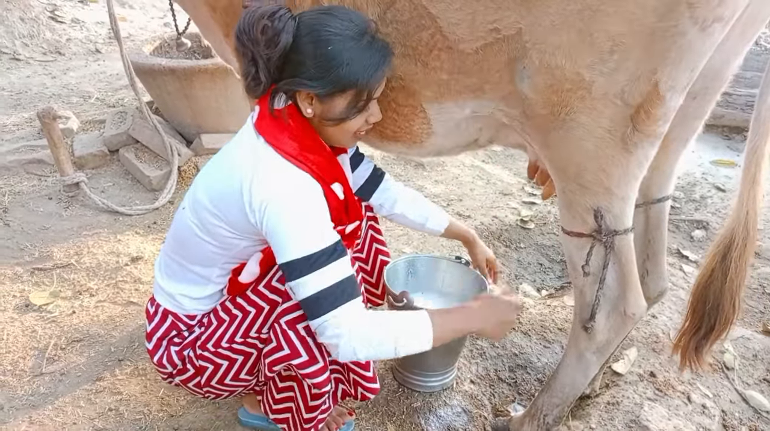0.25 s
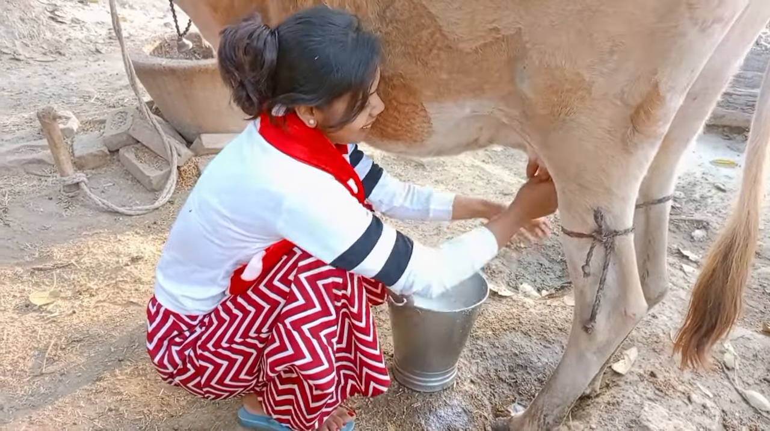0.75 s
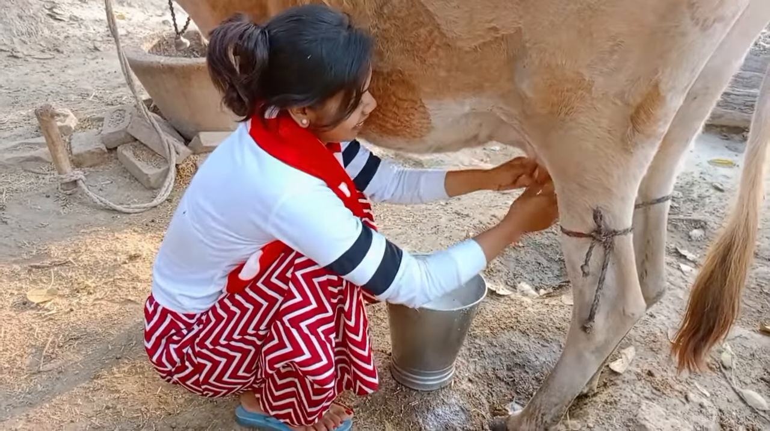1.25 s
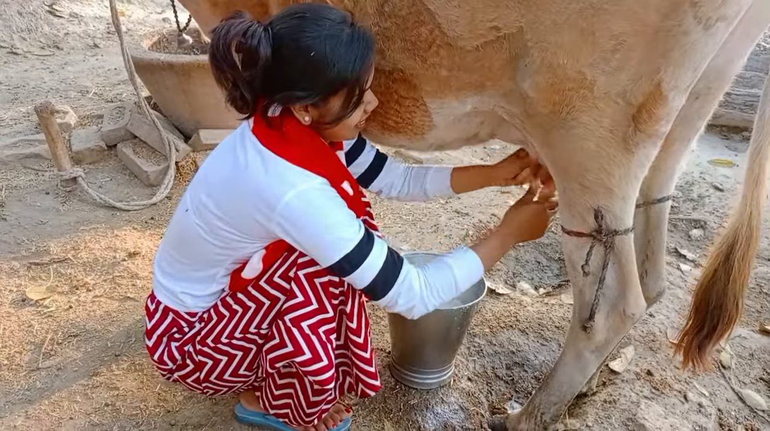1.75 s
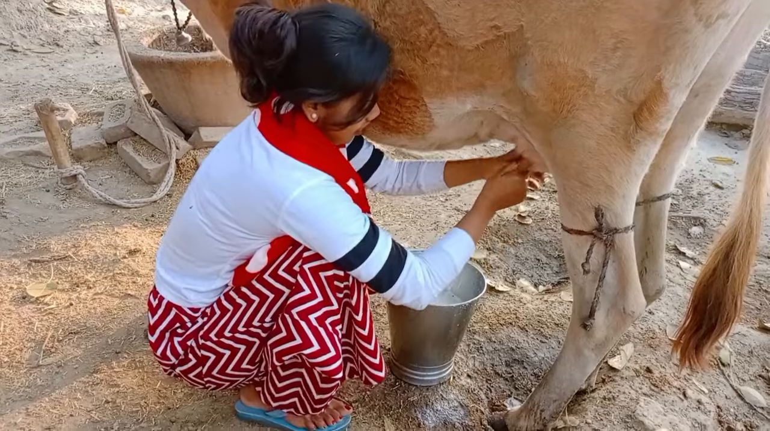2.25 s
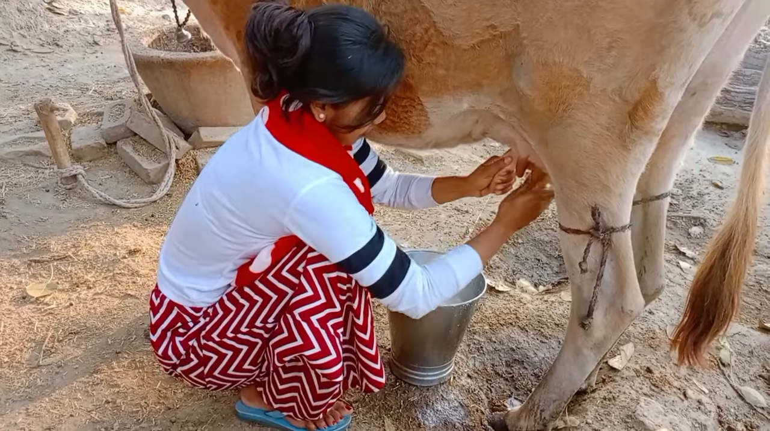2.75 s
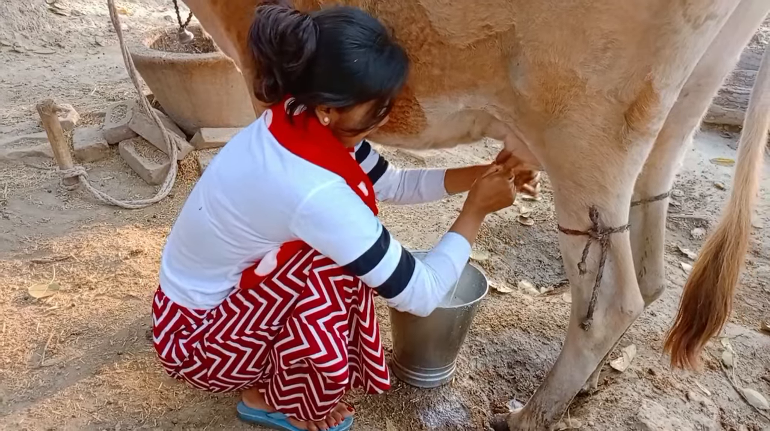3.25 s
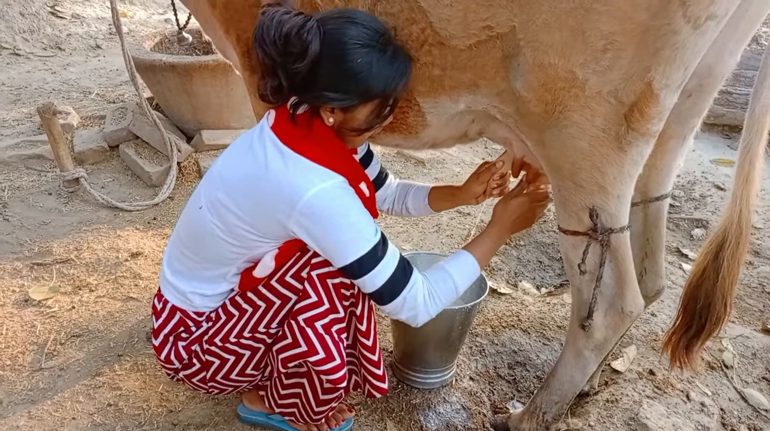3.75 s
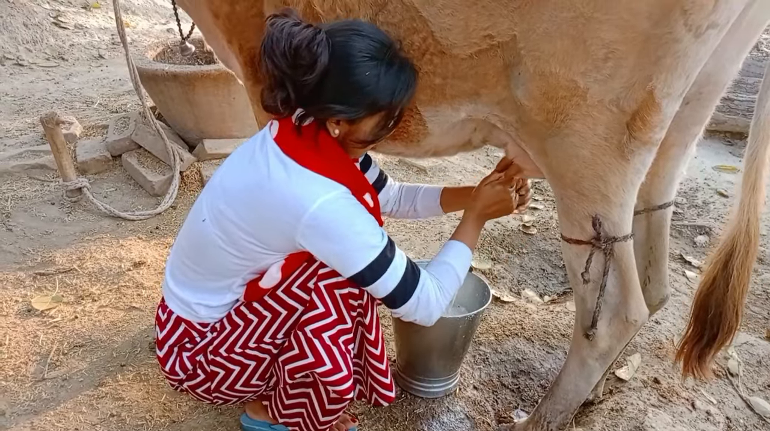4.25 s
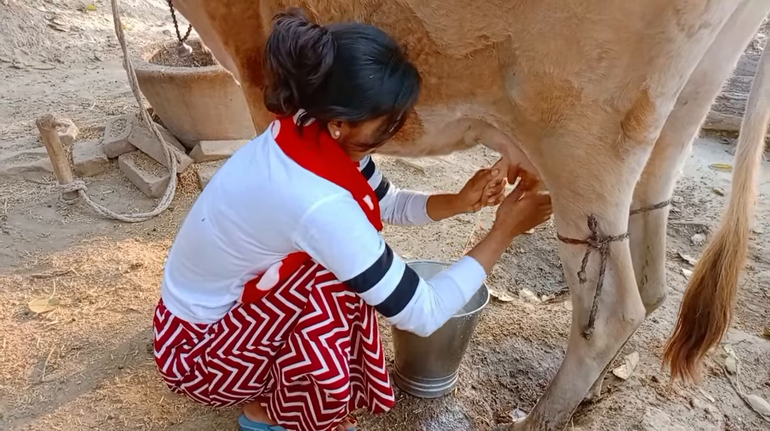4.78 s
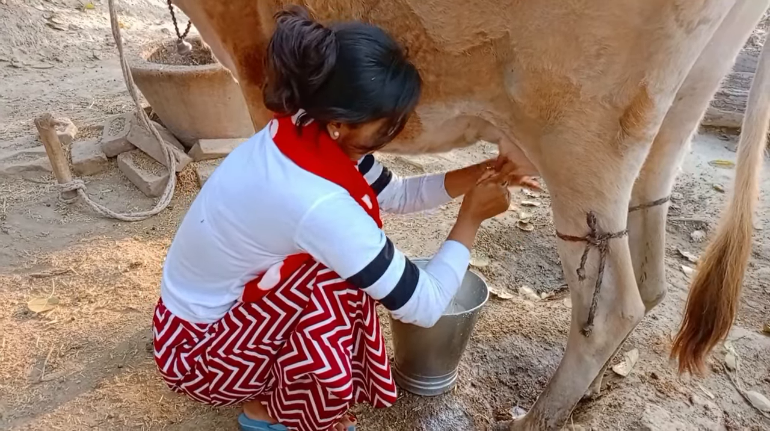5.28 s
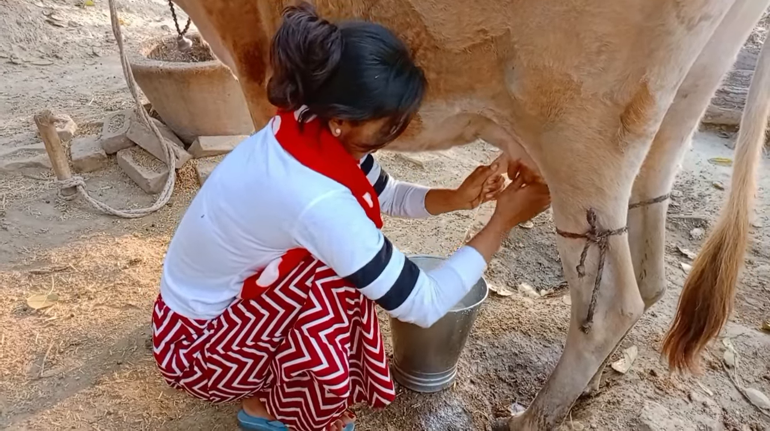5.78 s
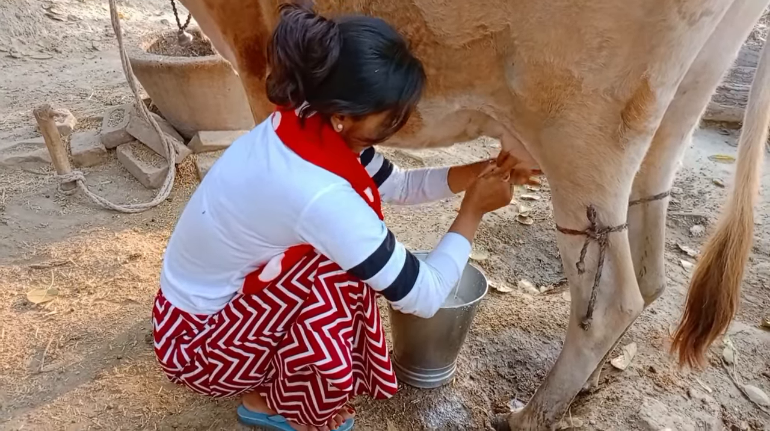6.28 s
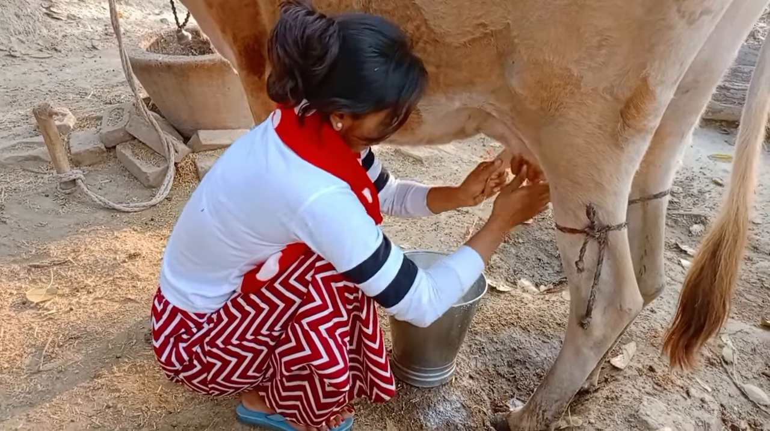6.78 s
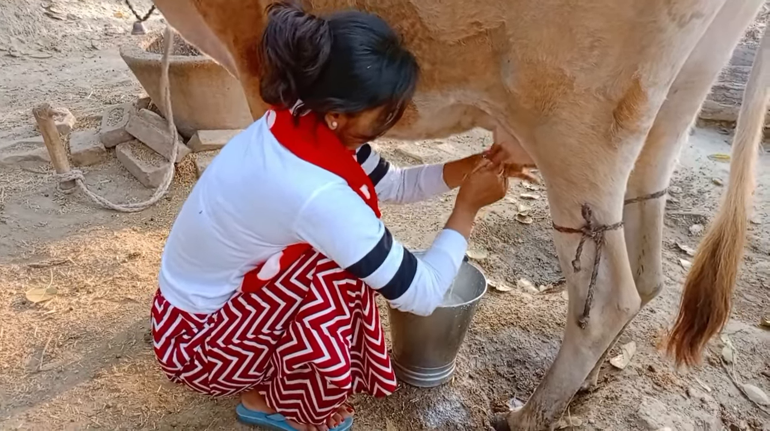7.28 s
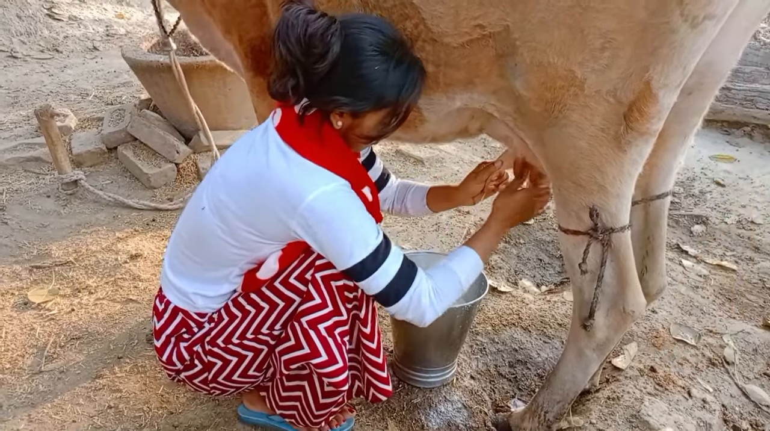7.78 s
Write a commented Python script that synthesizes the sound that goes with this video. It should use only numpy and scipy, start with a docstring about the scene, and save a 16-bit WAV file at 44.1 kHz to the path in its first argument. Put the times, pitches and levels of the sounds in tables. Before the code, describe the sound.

In an open farmyard, many small birds chatter continuously, mostly with short rising chirps at middle-high pitch, some raspy, plus thin peeps, over a blurred distant flock and light yard echoes. At 0 s a soft splash sounds in a metal bucket while a far single-cylinder engine thuds and drones, sinking away by about 2 s. Hoarse, longer calls of a larger bird overlap from 0.2 to 1.2 s. Gentle milk squirts come near 0.9 and 1.8 s, with a dull metallic knock at 1.7 s. Another faint jet arrives at 2.5 s, then the strongest hissing, splashing strokes at 3.1, 3.9 and 4.7 s, each about 0.3 s long and deepening in pitch. Drips tick around 4 s. Birds grow denser and louder from 5.2 to 7 s over lighter squirts at 5.5 and 6.2 s. Chirping thins as soft jets at 7.2 and 7.9 s close the scene.

```python
"""Hand milking among chattering birds

A cow is milked by hand in a farmyard; jets of milk, as random drops, hiss and splash in a metal bucket.
The bucket is knocked, dripped on and bumped: damped modes, two-tone ticks and wavering sines.
A flock chatters around it: arched, raspy glides, smeared by decaying noise echoes from walls and trees.
Far off a slow single-cylinder engine thuds and fades, with a drone at four times its firing rate."""
import sys
import numpy as np
from scipy import signal
from scipy.fft import rfft, irfft, next_fast_len
from scipy.io import wavfile
from scipy.ndimage import map_coordinates

SR = 44100
rng = np.random.default_rng(int(sys.argv[2]) if len(sys.argv) > 2 else 0)


def output_pcm(signal):
    """Save a mono or channel-first signal as 16-bit PCM at the path in sys.argv[1].

    Samples are clipped to [-1, 1] before scaling.
    """
    pcm = np.clip(np.atleast_2d(signal).T, -1, 1) * 32767
    wavfile.write(sys.argv[1], SR, np.round(pcm).astype(np.int16))


N = 354123
TIME = np.arange(N) / SR


def from_db(db):
    """Decibels to gain."""
    return 10 ** (np.asarray(db) / 20)


def rms_one(x):
    """Scale to unit rms."""
    return x / np.sqrt(np.mean(x ** 2) + 1e-20)


def in_time(rows):
    """Interpolate (time_s, value) rows at every sample."""
    return np.interp(TIME, *np.transpose(rows))


def coloured(x, spectrum):
    """Filter x by (freq_hz, gain_db) points, with a bass roll-off below the first; unit rms."""
    points_hz, points_db = np.transpose(spectrum)
    size = next_fast_len(N)
    bins_hz = np.maximum(np.fft.rfftfreq(size, 1 / SR), 1)
    gain = from_db(np.interp(np.log(bins_hz), np.log(points_hz), points_db))
    bass_cut = 1 + (points_hz[0] / 2 / bins_hz) ** 2
    return rms_one(irfft(rfft(x, size) * gain / bass_cut, size)[:N])


def wander(rate_hz, size):
    """Smooth random curve through normal draws made rate_hz times a second."""
    steps = np.arange(size) * rate_hz / SR
    return map_coordinates(rng.standard_normal(int(steps[-1]) + 2), [steps], order=2, mode="nearest")


def add(out, start_s, sound):
    """Mix a sound into out at start_s."""
    at = max(int(start_s * SR), 0)
    part = sound[:max(N - at, 0)]
    out[at:at + len(part)] += part


def swell(length_s, power):
    """Half-sine rise and fall raised to a power, unit rms; a low power is flatter."""
    size = max(int(length_s * SR), 20)
    return rms_one(np.abs(np.sin(np.linspace(0, np.pi, size))) ** power)


def yard(x, t60_s=0.44, gap_s=.008):
    """Dense echoes from walls, ground and leaves: decaying noise of unit energy after a gap."""
    t = TIME[:SR]
    echoes = rng.standard_normal(SR) * from_db(-60 * t / t60_s) * (t > gap_s)
    return signal.fftconvolve(x, echoes / np.linalg.norm(echoes))[:N]


# open air: freq_hz, gain_db
AIR_COLOUR = [(30, -18), (100, 1.5), (220, 1.5), (310, 1.5), (520, -6.5), (900, 2), (3000, -24.5),
              (6000, -34.5), (12000, -37), (16000, -29.5)]


def open_air(level_db=-66.5):
    """Steady coloured noise of the open air."""
    return from_db(level_db) * coloured(rng.standard_normal(N), AIR_COLOUR)


# hollow background: freq_hz, gain_db
HOLLOW_COLOUR = [(180, -18.5), (290, 1.5), (390, -1.5), (520, -25.5), (1000, -56.5)]


def rustle(level_db=-73, swell_db=5.5, rate_hz=7):
    """Faint hollow noise that swells and sinks unevenly."""
    gain = from_db(level_db + swell_db * wander(rate_hz, N))
    return gain * coloured(rng.standard_normal(N), HOLLOW_COLOUR)


# firing rate: time_s, firings_per_s
ENGINE_RATE = [(0, 20.7), (1.5, 20.7), (8.03, 23.1)]
# level of the thuds: time_s, level_db
THUD_LEVEL = [(0, -60), (.06, -43.5), (.16, -39), (.5, -58), (.65, -44.5), (.72, -60.5), (.89, -49),
              (.96, -54.5), (1.56, -52), (1.85, -65), (2.2, -63.5), (3.42, -70), (6.17, -72), (6.69, -95),
              (8.03, -71.5)]


def engine_thuds(firings, first_s=.012, thud_hz=144, thud_s=0.027, uneven_s=0.0013, echo_db=-10):
    """Each firing is a short exhaust thud, uneven in time and level, with yard echoes."""
    shape = swell(thud_s, power=3.2)
    thud = shape * np.sin(2 * np.pi * thud_hz * TIME[:len(shape)])
    thuds = np.zeros(N)
    for fire_s in TIME[np.diff(np.floor(firings), prepend=-1) > 0]:
        gain = from_db(rng.normal(0, 2.3))
        add(thuds, fire_s + first_s + rng.normal(0, uneven_s), gain * thud)
    thuds = thuds + from_db(echo_db) * yard(thuds)
    return from_db(in_time(THUD_LEVEL)) * rms_one(thuds)


def engine_drone(firings, level_db=-48.5, early_db=-5.5, start_s=0.32, hold_s=1.27, drop_s=0.16,
                 drop_db=19, fade_db_per_s=5.5):
    """Sine at four times the firing rate: steps up, drops quickly after the hold; fades throughout."""
    drone = np.sqrt(2) * np.sin(2 * np.pi * 4 * firings)
    early = np.clip((start_s - TIME) / .03, 0, 1)
    dropped = np.clip((TIME - hold_s) / drop_s, 0, 1)
    drone_db = level_db + early_db * early - drop_db * dropped - fade_db_per_s * TIME
    return from_db(drone_db + 2 * wander(23, N)) * drone


def engine():
    """Thuds and drone locked to one running count of firings."""
    firings = np.cumsum(in_time(ENGINE_RATE)) / SR
    return engine_thuds(firings) + engine_drone(firings)


def chirp(length_s, start_hz, end_hz, rasp, arch=0.022, scatter=0.0886, trill_hz=125, trill=0.028,
          flutter=0.74, second_db=-58, third_db=-41):
    """Arched whistle glide with two harmonics; rasp shakes its pitch and chops its level; unit rms."""
    shape = swell(length_s, power=0.027)
    size = len(shape)
    soft_ends = signal.windows.tukey(size, .45)
    u = np.linspace(0, 1, size)
    buzz_hz = trill_hz * (1 + 0.2345 * wander(60.3, size))
    buzz = np.sin(2 * np.pi * np.cumsum(buzz_hz) / SR)
    bend = arch * (4 * u * (1 - u) - 2 / 3)
    shake = rasp * (scatter * np.tanh(wander(600, size)) + trill * buzz)
    pitch_hz = (start_hz + (end_hz - start_hz) * u) * (1 + bend + shake)
    phase = 2 * np.pi * np.cumsum(pitch_hz) / SR
    voice = np.sin(phase) + from_db(second_db) * np.sin(2 * phase) + from_db(third_db) * np.sin(3 * phase)
    effort = from_db(3.3 * wander(92.1, size))
    return rms_one(shape * soft_ends * effort * voice * (1 + flutter * rasp * buzz))


def slur(length_s, pitch_hz, octaves, rasp):
    """Chirp gliding through the given octaves, centred on pitch_hz."""
    return chirp(length_s, pitch_hz * 2 ** (-octaves / 2), pitch_hz * 2 ** (octaves / 2), rasp)


# colour of the far flock: freq_hz, gain_db
FAR_COLOUR = [(700, -17), (1200, -9), (1700, -5.5), (2400, 0.5), (3100, -3), (3800, -11), (5000, -29.5),
              (7500, -36), (12000, -50)]


def far_birds(count=480):
    """Many short, mostly rising notes, one in each equal time slot; unit rms."""
    out = np.zeros(N)
    for k, (when, pitch, slope, span, loud, rasp) in enumerate(rng.random((count, 6))):
        start_hz = 1550 + 1900 * pitch
        end_hz = start_hz * (.93 + 0.1775 * slope)
        note = chirp(0.0211 + 0.0476 * span, start_hz, end_hz, 0.38 * rasp)
        add(out, (k + when) / count * N / SR, from_db(5 * loud) * note)
    return coloured(out, FAR_COLOUR)


# swell and ebb of the far flock, before its mix gains: time_s, level_db
FLOCK_LEVEL = [(0, -31), (.3, -31.5), (1.3, -29.5), (1.65, -26.5), (2.2, -34), (3.2, -37), (3.73, -40),
               (3.96, -34), (4.2, -38.5), (6.15, -39.5), (6.93, -34), (7.13, -45.5), (7.4, -37),
               (8.03, -38.5)]


def far_flock():
    """Far notes, their yard echoes and a noise wash of the same colour share one level curve."""
    far = far_birds()
    wash = coloured(rng.standard_normal(N), FAR_COLOUR)
    mix = from_db(-14.0) * far + from_db(-13.0) * yard(far) + from_db(-14.0) * wash
    return from_db(in_time(FLOCK_LEVEL)) * mix


def twitter(count=220, level_db=-73, spread_db=8, tilt_db=-7, within_s=0.24):
    """Tiny high chips scattered after the onsets of the thin high notes."""
    out = np.zeros(N)
    for k, (delay, pitch, slope, span, loud) in enumerate(rng.random((count, 5))):
        start_s = THIN_HIGH_NOTES[k * len(THIN_HIGH_NOTES) // count][0] + within_s * delay
        start_hz = 5500 + 4500 * pitch
        note = chirp(0.0086 * (1 + 2 * span), start_hz, start_hz * (.96 + 0.056 * slope), 0.16)
        gain = from_db(level_db + spread_db * loud + tilt_db * pitch)
        add(out, start_s, gain * note * np.hanning(len(note)))
    return out


def answers(count=16, low_hz=2200, high_hz=3300, level_db=-48, spread_db=5, length_s=0.078,
            rise_octaves=0.14, rasp=0.12, within_s=.2):
    """Softer rising notes from other birds, each set off by one of the loud chirps."""
    out = np.zeros(N)
    for k, (delay, pitch, span, loud) in enumerate(rng.random((count, 4))):
        start_s = LOUD_CHIRPS[k * len(LOUD_CHIRPS) // count][0] + within_s * delay
        pitch_hz = low_hz + (high_hz - low_hz) * pitch
        note = slur(length_s * (.5 + span), pitch_hz, rise_octaves, rasp)
        add(out, start_s, from_db(level_db + spread_db * loud) * note)
    return out


# the flock's loudest notes: start_s, length_s, start_hz, end_hz, level_db, rasp_0_to_1
LOUD_CHIRPS = [(0.055, 0.043, 2180, 1976, -26.5, 0.05), (0.114, 0.14, 2135, 1993, -34, 0.72),
               (0.12, 0.031, 2560, 2780, -37.5, 0.15), (0.121, 0.076, 3050, 3450, -36, 0.55),
               (0.193, 0.052, 3365, 3960, -39.5, 0.18), (0.228, 0.059, 2382, 2680, -28, 0.09),
               (0.299, 0.033, 2097, 2014, -30.5, 0.38), (0.367, 0.05, 2880, 2966, -32.5, 0.12),
               (0.407, 0.12, 2996, 3470, -32, 0.18), (0.531, 0.062, 3770, 4070, -43.5, 0.3),
               (0.763, 0.16, 2390, 2890, -39, .4), (0.941, 0.056, 2930, 3026, -33, 0.08),
               (1.073, 0.064, 2820, 3160, -40, 0), (1.247, 0.051, 2890, 3030, -45.5, 0.05),
               (1.463, 0.088, 2210, 2410, -43, 0.27), (1.574, 0.069, 2400, 2640, -34.5, 0.62),
               (1.624, 0.057, 2550, 2980, -33, 0.83), (1.676, 0.084, 3910, 4190, -41, 0.46),
               (1.727, 0.092, 3073, 2906, -30, 0.39), (1.774, 0.046, 3750, 4050, -37, 0.23),
               (1.912, 0.074, 2352, 2514, -35.5, 0.07), (2.028, 0.062, 2120, 1820, -42.5, 0.28),
               (2.096, 0.062, 2820, 3020, -50, 0.24), (2.164, 0.025, 1840, 1680, -42.5, 0.1),
               (2.383, 0.068, 2120, 2440, -43.5, 0.34), (2.493, 0.062, 2183, 2285, -35.5, 0.48),
               (2.581, 0.076, 2400, 2507, -39.5, 0.44), (2.705, 0.12, 2780, 3057, -39, 0.28),
               (2.785, 0.11, 4110, 3800, -47.5, 0.15), (2.856, 0.034, 2840, 2590, -38, 0.7),
               (2.914, 0.057, 2257, 2565, -40.5, 0.04), (3.171, .11, 3000, 3653, -36, 0.55),
               (3.317, 0.13, 3104, 3268, -35.5, 0.2), (3.338, 0.096, 2740, 2960, -37.5, 0.35),
               (3.453, 0.084, 3360, 3670, -38, 0.44), (3.551, 0.1, 2370, 2754, -33, 0.24),
               (3.632, 0.064, 2760, 3076, -28, 0.67), (4.154, 0.09, 2297, 2490, -38.5, 0.52),
               (4.219, .1, 3640, 3720, -48, 0.38), (4.297, 0.15, 2500, 3500, -39, 0.64),
               (4.322, 0.12, 3590, 3852, -36, 0.19), (4.488, 0.034, 2230, 3040, -45, 0.4),
               (4.497, 0.064, 1952, 2230, -44, 0.02), (4.5, 0.086, 3630, 3880, -48, 0.38),
               (4.62, .14, 2957, 3164, -39, 0.47), (4.831, 0.061, 3517, 3890, -41.5, 0.32),
               (4.923, .11, 3203, 3600, -44.5, 0.86), (5.059, 0.049, 2880, 2860, -38, 0),
               (5.197, 0.087, 1886, 2520, -37.5, 0.65), (5.286, 0.05, 2618, 2748, -28.5, 0.24),
               (5.35, 0.097, 2754, 2664, -42, 0.06), (5.462, 0.052, 2223, 2377, -27.5, 0.31),
               (5.551, .11, 2770, 3060, -34, 0.55), (5.63, 0.096, 3140, 3397, -33.5, 0.7),
               (5.655, 0.052, 2205, 1788, -38, 0.4), (5.77, 0.075, 3150, 3266, -33, 0.28),
               (5.837, 0.09, 3517, 3940, -38.5, 0.42), (5.854, 0.04, 2780, 2865, -38, 0.37),
               (5.922, 0.047, 2368, 2480, -41.5, 0.2), (5.946, 0.089, 3240, 3160, -34.5, 0.27),
               (6.019, 0.09, 2387, 2804, -30.5, 0.62), (6.092, 0.12, 2628, 2980, -32, 0.55),
               (6.094, .06, 2187, 2260, -38, 0.3), (6.248, 0.22, 3396, 3560, -37.5, 0.08),
               (6.318, 0.1, 2150, 2130, -43.5, .3), (6.417, 0.064, 2223, 2764, -30.5, 0.41),
               (6.543, 0.038, 2206, 2506, -38.5, 0.12), (6.584, 0.036, 2910, 3110, -38.5, 0.25),
               (6.591, 0.073, 1430, 1473, -35.5, 0.3), (6.69, 0.098, 2504, 2606, -34, 0.34),
               (6.73, 0.1, 1341, 1258, -48.5, 0.33), (6.754, 0.055, 3015, 2860, -38.5, 0.3),
               (6.818, 0.064, 2560, 2568, -32, 0.2), (6.906, 0.052, 2810, 3113, -27, 0.26),
               (6.935, 0.065, 1970, 2310, -40.5, 0.06), (7.048, 0.086, 3467, 3064, -34, 0.71),
               (7.566, 0.11, 2460, 2280, -41, 0.66), (7.734, 0.097, 1616, 1560, -50, 0),
               (7.78, 0.13, 3810, 3680, -51, 0.22), (7.847, .15, 2650, 2792, -37.5, 0.24),
               (7.906, 0.093, 2918, 3110, -37, 0.44)]
# thin high notes (peeps, and overtones of lower chirps):
# start_s, length_s, start_hz, end_hz, level_db, rasp_0_to_1
THIN_HIGH_NOTES = [(0, 0.11, 3940, 4590, -44.5, 0.18), (.262, 0.063, 4180, 4500, -44.5, 0.47),
                   (0.415, 0.069, 4270, 4490, -40.5, 0.082), (.569, 0.12, 5930, 6170, -58, 0.29),
                   (0.578, 0.094, 4390, 4560, -43, 0.41), (0.85, 0.29, 4360, 4570, -50, 0.33),
                   (1.272, 0.033, 5720, 5770, -56.5, 0.18), (1.634, 0.14, 6420, 6540, -61.5, 1),
                   (2.651, 0.043, 6100, 6170, -60.5, 0.3), (2.677, 0.066, 4380, 4240, -56, 0.13),
                   (3.165, 0.053, 4440, 4650, -46.5, 0.33), (3.544, 0.11, 4106, 4400, -48, 0.36),
                   (4.202, 0.2, 6090, 5820, -65, 0.28), (4.535, 0.036, 8100, 7920, -64, .1),
                   (4.6, 0.084, 4395, 4610, -48, 0.37), (4.95, 0.072, 6050, 6320, -69, 0.32),
                   (5.7, 0.063, 4280, 4600, -45, 0.6), (5.76, 0.079, 5250, 5200, -53, 0.59),
                   (5.919, 0.044, 6930, 7040, -60, 0.19), (6.088, 0.12, 4510, 4704, -40, 0.23),
                   (6.684, 0.23, 4420, 4415, -60, 0.32), (6.712, 0.12, 5980, 6220, -55, 1),
                   (6.8, 0.13, 6410, 6450, -58.5, 0.094), (6.996, 0.054, 4270, 4600, -37, 0.24),
                   (7.681, 0.07, 5820, 5670, -69, 0.49), (7.725, 0.07, 4460, 4450, -58.5, 0.36),
                   (7.802, 0.18, 5800, 5550, -66.5, 0.36)]
# long hoarse calls of a larger bird: start_s, length_s, pitch_hz, level_db
LARGE_BIRD_CALLS = [(0.202, 0.46, 1321, -41.5), (0.476, 0.21, 1207, -44), (0.529, 0.3, 1625, -44.5),
                    (0.571, 0.42, 900, -47.5), (0.807, 0.15, 1373, -42.5), (0.952, 0.3, 1078, -43.5)]


def near_birds(high_second_db=-26, hoarse_fall_octaves=0.052, hoarse_rasp=0.87):
    """Chirps and thin high notes glide each on their own; hoarse calls all sink by one small interval."""
    out = np.zeros(N)
    for start_s, length_s, start_hz, end_hz, level_db, rasp in LOUD_CHIRPS:
        add(out, start_s, from_db(level_db) * chirp(length_s, start_hz, end_hz, rasp))
    for start_s, length_s, start_hz, end_hz, level_db, rasp in THIN_HIGH_NOTES:
        high_note = chirp(length_s, start_hz, end_hz, rasp, second_db=high_second_db)
        add(out, start_s, from_db(level_db) * high_note)
    for start_s, length_s, pitch_hz, level_db in LARGE_BIRD_CALLS:
        call = slur(length_s, pitch_hz, -hoarse_fall_octaves, hoarse_rasp)
        add(out, start_s, from_db(level_db) * call)
    return out


def through_leaves(x, top_hz=10300):
    """Air and foliage take the very top off the birds: a low-pass."""
    return signal.sosfilt(signal.butter(8, top_hz, fs=SR, output="sos"), x)


def wall_echo(x, delay_s=.055, echo_db=-13):
    """One wall throws each note back distinctly."""
    return x + from_db(echo_db) * np.interp(TIME - delay_s, TIME, x, left=0)


# soft hollow bumps around the bucket: start_s, length_s, pitch_hz, level_db
BUMPS = [(0.56, 0.086, 746, -52.5), (1.071, 0.051, 614, -50.5), (1.491, 0.14, 713, -50),
         (3.056, 0.031, 357, -45.5), (3.246, 0.068, 490, -54.5), (4.068, 0.034, 703, -39.5),
         (6.201, 0.075, 796, -54), (6.302, 0.2, 405, -52), (7.664, 0.043, 352, -47.5),
         (7.908, 0.073, 777, -52.5)]


def plops(waver=0.067):
    """Dull bumps: swelling sines of wavering pitch."""
    out = np.zeros(N)
    for start_s, length_s, pitch_hz, level_db in BUMPS:
        shape = swell(length_s, power=0.13)
        phase = 2 * np.pi * np.cumsum(pitch_hz * (1 + waver * wander(190, len(shape)))) / SR
        add(out, start_s, from_db(level_db) * shape * np.sin(phase))
    return out


# drops ticking on the bucket's wall, level before the band-pass: start_s, level_db, pitch_hz
WALL_DRIPS = [(0.878, -28, 1690), (3.878, -32.5, 1550), (3.966, -28.5, 2010), (4.028, -26, 1860)]


def drips(low_hz=1100, soft_hz=2800, t60_s=0.048, overtone_ratio=1.3, overtone_db=-8):
    """Each drop gives a short, soft two-toned tick."""
    t, out = TIME[:SR // 4], np.zeros(N)
    for start_s, level_db, pitch_hz in WALL_DRIPS:
        phase = 2 * np.pi * pitch_hz * t
        tones = np.sin(phase) - from_db(overtone_db) * np.sin(overtone_ratio * phase)
        add(out, start_s, from_db(level_db - 60 * t / t60_s) * tones)
    return signal.sosfilt(signal.butter(3, [low_hz, soft_hz], "band", fs=SR, output="sos"), out)


# blows on the bucket, level before the band-pass: start_s, level_db
BLOWS = [(1.7257, -13.5), (1.7293, -22.5), (1.7345, -26), (1.7434, -31), (5.436, -43.5)]
# hand-damped bucket modes: freq_hz, level_db, t60_s
BUCKET_MODES = [(408, -5.5, 0.046), (507, -1, 0.03), (737, -22.5, 0.33), (950, -18, 0.043),
                (1256, -2, 0.084), (1460, -2.5, 0.025), (1820, -13.5, 0.026), (2190, -13, 0.034),
                (2800, -9, .025)]


def knocks(low_hz=375, soft_hz=2800, rattle_db=-4.5, rattle_t60_s=0.13, detune=0.04):
    """Blows ring modes shifted by the grip, plus a rattle; soft contact, and no bass from the thin wall."""
    t, out = TIME[:SR // 2], np.zeros(N)
    for start_s, level_db in BLOWS:
        blow = from_db(rattle_db - 60 * t / rattle_t60_s) * rng.standard_normal(len(t))
        shifts = 1 + detune * rng.standard_normal(len(BUCKET_MODES))
        for k, (freq_hz, mode_db, t60_s) in enumerate(BUCKET_MODES):
            mode = from_db(mode_db - 60 * t / t60_s) * np.sin(2 * np.pi * freq_hz * shifts[k] * t)
            blow += (-1) ** k * mode
        add(out, start_s, from_db(level_db) * blow)
    return signal.sosfilt(signal.butter(5, [low_hz, soft_hz], "band", fs=SR, output="sos"), out)


def droplets(per_s):
    """A jet breaks into drops of uneven size that arrive at random; their level clumps loosely."""
    clumps_db = 1.7 * wander(35, N) + 1.9 * wander(170, N)
    sizes = rng.standard_normal(N)
    return (rng.random(N) < per_s / SR) * sizes * from_db(clumps_db)


# air resonances of the pail: freq_hz, gain_linear
PAIL_RESONANCES = [(1320, 1), (2060, 0.3), (2620, .6)]


def hollowed(x, sharpness=11):
    """Air in the pail rings along with the splash; power is kept."""
    rung = x.copy()
    for freq_hz, gain in PAIL_RESONANCES:
        rung += gain * signal.lfilter(*signal.iirpeak(freq_hz, sharpness, fs=SR), x)
    return rms_one(rung) * np.std(x)


def in_bucket(x, echo=0.4):
    """Sound bounces across the pail by three paths, which shift with the aim of the jet."""
    out, samples = x.copy(), np.arange(N)
    for path_s in (.0009, .0016, .0027):
        lag = path_s * SR * (1 + 0.067 * wander(2.2, N))
        out += echo * np.interp(samples - lag, samples, x)
    return out


# milk jets and short spits: start_s, length_s, hiss_db, splash_db, splash_pitch_hz
MILK_JETS = [(0, 0.28, -52.5, -48.5, 1963), (0.856, 0.085, -60, -50, 2016),
             (0.977, 0.078, -51, -46.5, 2000), (0.975, 0.29, -51.5, -46.5, 2050),
             (1.817, 0.2, -56, -53, 2040), (2.49, 0.23, -57.5, -56, 1947), (3.124, 0.3, -44.5, -37, 2397),
             (3.893, 0.31, -44, -37, 1850), (4.675, .29, -45, -45, 2360), (5.512, 0.18, -45.5, -47, 2050),
             (5.631, 0.13, -56, -65, 2100), (6.245, 0.18, -55, -64.5, 2310), (7.209, .25, -50.5, -56, 2320),
             (7.901, 0.26, -61.5, -51, 2040)]
# spray on the bucket's wall: freq_hz, gain_db
HISS_COLOUR = [(2500, -4.5), (4000, 2), (5000, -4), (6100, 10.5), (7500, 4), (9000, 0), (10500, -6),
               (13200, -15.5), (15000, -1.5), (16000, 8.5)]
# splash at a reference pitch of 2 kHz: freq_hz, gain_db
SPLASH_COLOUR = [(300, -31), (560, -17.5), (900, -14.5), (1200, -3.5), (2100, 5), (2900, 0.5), (3800, -5),
                 (5100, -17.5), (6400, -19), (12000, -49)]


def milk(aim_octaves=0.54, sag_db=3):
    """Jets spray the wall and splash in the milk; each splash deepens and softens as the jet digs in."""
    hiss_level, splash = np.zeros(N), np.zeros(N)
    drops = coloured(droplets(per_s=8000), SPLASH_COLOUR)
    for start_s, length_s, hiss_db, splash_db, pitch_hz in MILK_JETS:
        flow = swell(length_s, power=2.48)
        fall = np.linspace(.5, -.5, len(flow))
        # replay speed sets the splash pitch
        speed = pitch_hz / 2000 * 2 ** (aim_octaves * fall)
        splashing = map_coordinates(drops, [rng.random() * N / 2 + np.cumsum(speed)], order=3)
        add(hiss_level, start_s, from_db(hiss_db) * flow)
        add(splash, start_s, from_db(splash_db + 2 * sag_db * fall) * flow * splashing)
    hiss = hiss_level * coloured(droplets(per_s=5100), HISS_COLOUR)
    return in_bucket(hiss + hollowed(splash))


def scene():
    """Engine and air behind, birds around the yard, bucket close by."""
    background = open_air() + rustle() + engine()
    birds = through_leaves(near_birds() + answers() + twitter())
    birds = wall_echo(birds) + from_db(-2) * yard(birds)
    bucket = milk() + drips() + knocks() + plops()
    bucket = bucket + from_db(-18) * yard(bucket)
    return (background + far_flock() + birds + bucket)[None]


def record(dry, cutoff_hz=15850):
    """Cut the top steeply with an elliptic low-pass."""
    return signal.sosfilt(signal.ellip(12, .1, 80, cutoff_hz, fs=SR, output="sos"), dry)


dry = scene()
out = record(dry)
output_pcm(out)
```